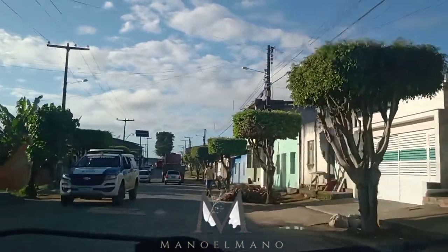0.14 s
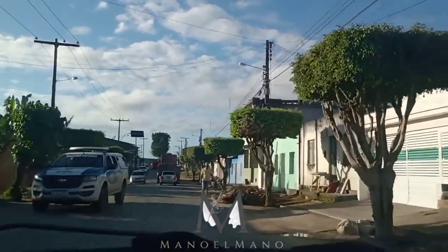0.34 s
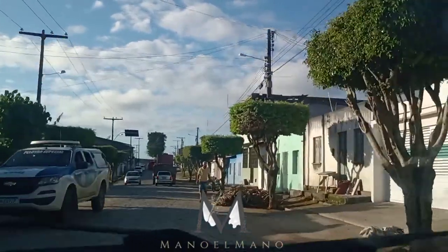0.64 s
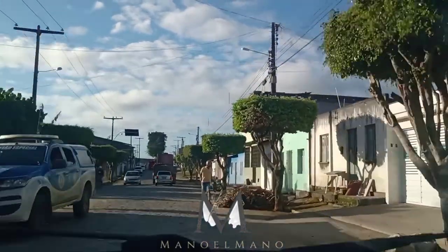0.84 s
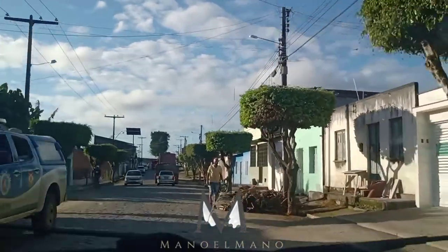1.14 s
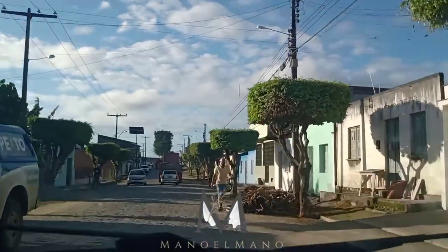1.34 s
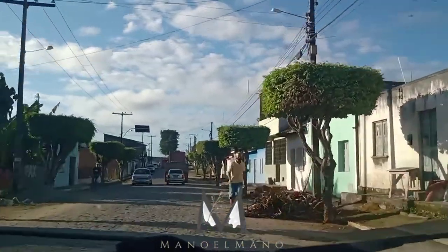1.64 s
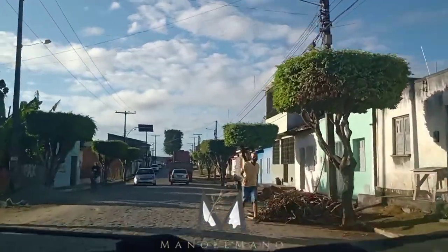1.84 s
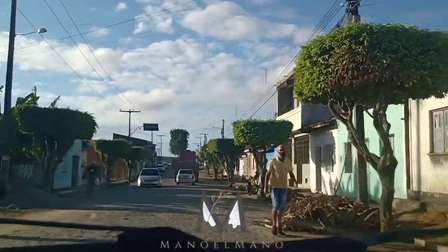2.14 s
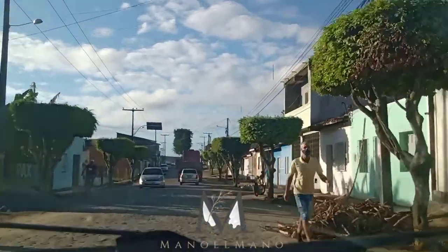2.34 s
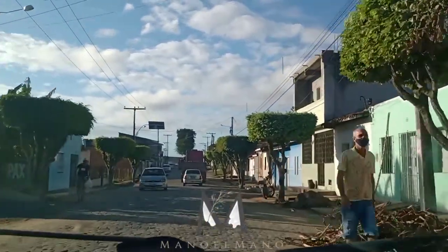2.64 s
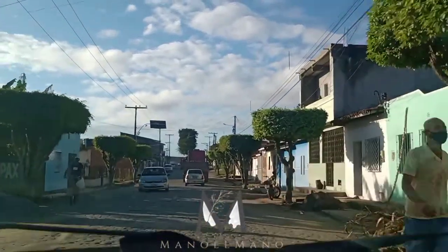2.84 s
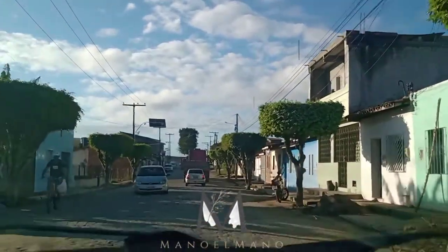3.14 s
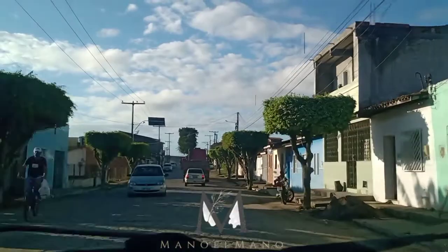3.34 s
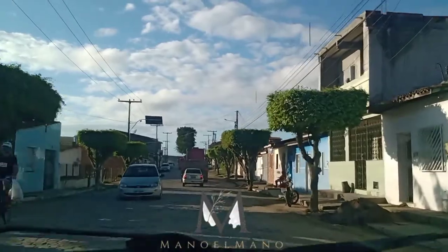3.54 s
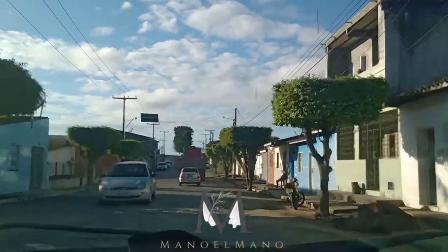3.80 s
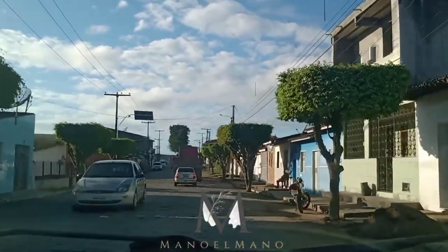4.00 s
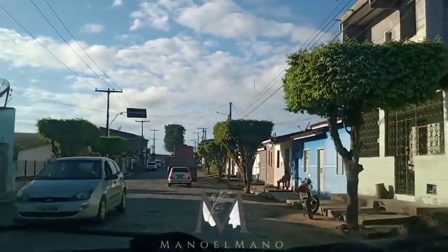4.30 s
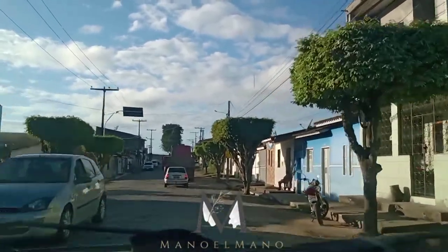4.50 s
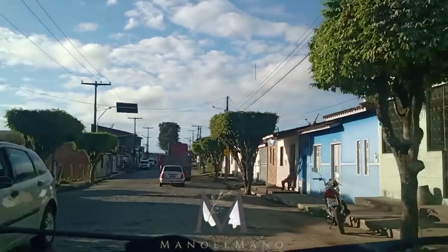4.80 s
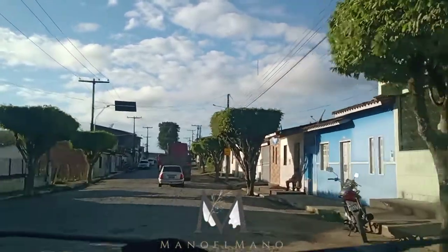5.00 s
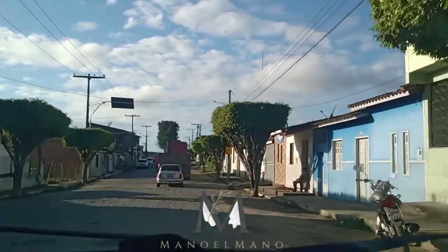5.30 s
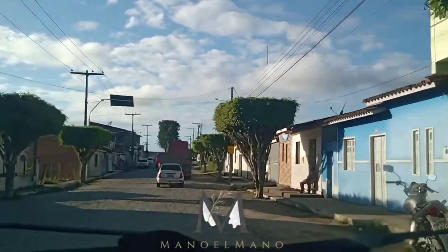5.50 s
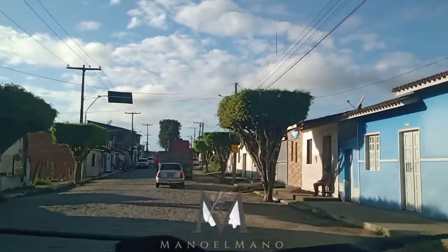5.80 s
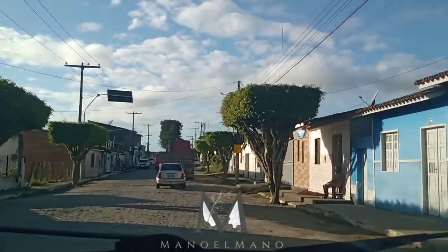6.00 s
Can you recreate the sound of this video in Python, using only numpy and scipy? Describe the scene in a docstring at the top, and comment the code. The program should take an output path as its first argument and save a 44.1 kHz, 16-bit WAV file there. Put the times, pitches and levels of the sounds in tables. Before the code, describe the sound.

Bumpy cobbled-street ride heard from the cabin: booming bodywork, drumming panels, rattling plastic, and one vehicle swishing past outside around two seconds.

```python
"""Inside a car that rolls over cobbles: stones thump the tyres, the body booms and the panels drum.
Loose trim rustles with the jolts, a clip knocks, panels thud and crack, small metal ticks, a mount squeaks
once and the swish of a vehicle passing outside comes and goes. A phone microphone cuts the top.
Random clicks ring resonances for the boom, drumming and rustle; short decaying tones make the knocks;
shaped noise makes the cracks, hum, squeak, swish and hiss."""
import sys
import numpy as np
from scipy import signal
from scipy.io import wavfile
from scipy.ndimage import uniform_filter1d

SR = 44100
rng = np.random.default_rng(int(sys.argv[2]) if len(sys.argv) > 2 else 0)


def digitize_waveform(pressure):
    """Quantize a signal to 16-bit integers and store it at the path in sys.argv[1].

    Rows of a 2-D input are taken as channels; values are limited to [-1, 1].
    """
    field = np.atleast_2d(pressure).T
    bounded = np.clip(field, -1, 1)
    quanta = np.round(bounded * 32767).astype(np.int16)
    wavfile.write(sys.argv[1], SR, quanta)


def volts_from_db(level):
    """Convert decibel levels to linear amplitude ratios."""
    exponent = np.asarray(level, float) / 20
    return 10 ** exponent


N = 271215   # length in samples


def rms_one(x):
    """Scales a sound to an rms of 1."""
    return x / np.sqrt(np.mean(x ** 2) + 1e-20)


def in_time(rows):
    """Joins each column by straight lines over the times in the first, one value a sample."""
    s, *columns = np.transpose(rows)
    return [np.interp(np.arange(N) / SR, s, column) for column in columns]


def drift(rate_hz):
    """Smooth random wandering with an rms of 1; a higher rate wanders faster."""
    # made at one value per 40 samples; the first 2000 values let the filter settle
    r = np.exp(-80 * np.pi * rate_hz / SR)
    noise = rng.standard_normal(N // 40 + 2002)
    slow = signal.lfilter([1], [1, -2 * r, r * r], noise)[2000:]
    return np.interp(np.arange(N) / 40, np.arange(len(slow)), rms_one(slow))


def band_pass(x, edges_hz):
    """Keeps what lies between two frequencies."""
    return signal.sosfilt(signal.butter(2, edges_hz, "band", fs=SR, output="sos"), x)


def resonate(x, hz, width_hz):
    """A resonance of gain 1 at its top."""
    r = np.exp(-np.pi * width_hz / SR)
    feedback = [1, -2 * r * np.cos(2 * np.pi * hz / SR), r * r]
    return signal.lfilter([(1 - r * r) / 2, 0, (r * r - 1) / 2], feedback, x + 1e-18)


def through(peaks, x):
    """Sends a sound through resonances in parallel, signs alternating."""
    return sum((-1) ** k * volts_from_db(db) * resonate(x, hz, width) for k, (hz, width, db) in enumerate(peaks))


def grains(per_s, spread_db):
    """Random clicks of uneven size and either sign."""
    sizes = volts_from_db(spread_db * np.minimum(rng.exponential(1, N), 5)) * rng.choice([-1, 1], N)
    return sizes * (rng.random(N) < per_s / SR)


def evened(x, over_s):
    """Slow swells are halved in dB, so that the road sets the level."""
    swell = np.sqrt(uniform_filter1d(x ** 2, round(over_s * SR)) + 1e-12)
    return rms_one(x / np.sqrt(swell))


def wavering(hz, width_hz):
    """Noise in a narrow band that follows a pitch."""
    turn = 2 * np.pi * np.cumsum(hz) / SR
    return drift(width_hz) * np.sin(turn) + drift(width_hz) * np.cos(turn)


def thump(rows, rise_cycles):
    """A soft blow swells over a part of a cycle or more, then dies away."""
    out = np.zeros(N + SR)
    for (s, db, hz), turn in zip(rows, rng.uniform(-.5, .5, len(rows))):
        cycles = np.arange(SR // 5) / SR * hz
        swell = cycles / rise_cycles * np.exp(1 - cycles / rise_cycles)
        i = round((s - rise_cycles / hz) * SR)   # starts early, so that the swell tops out at s
        out[i:i + len(cycles)] += volts_from_db(db) * swell * np.sin(2 * np.pi * cycles + turn)
    return out[:N]


def strike(hits, modes, vary_db, contact_s, detune):
    """A blow and two weaker bounces ring every mode, each hit with its own mode strengths and detuning."""
    out, t = np.zeros(N + SR), np.arange(SR // 5) / SR
    hz, level_db, t60 = np.transpose(modes)[:, :, None]
    chance = rng.standard_normal((len(hits), 2, len(modes), 1))
    bounces = np.cumsum(rng.uniform(.3, 1, (len(hits), 2)), axis=1) * contact_s
    for (s, db), (strength, pitch), later in zip(hits, chance, bounces):
        decay = volts_from_db(db + level_db + vary_db * strength - 60 * t / np.maximum(t60, .005))
        ring = np.sum(decay * np.sin(2 * np.pi * hz * (1 + detune * pitch) * t), axis=0)
        ring *= 1 - np.exp(-t / .0004)   # the blow builds up over 0.4 ms
        for lag, size in zip([0, *later], [1, .3, .2]):
            i = round((s + lag) * SR)
            out[i:i + len(t)] += size * ring
    return out[:N]


def faint(level_db):
    """Weak blows at random moments, 1.5 a second."""
    chance = rng.random((round(1.5 * N / SR), 2))
    return [(s * (N - 1) / SR, level_db + 6 * (size - .5)) for s, size in chance]


def ride():
    """The road and its stretches set the boom; panels and trim follow the road with shares of their own."""
    # how rough the road is, as a level for the boom: t/s, level/dB
    roughness = [(0.0, -19), (0.24, -26), (0.45, -27.5), (1.03, -29), (2.24, -25.5), (2.43, -24.5),
                 (3.54, -25), (3.63, -24.5), (3.8, -26.5), (4.16, -25), (5.17, -24), (5.72, -28),
                 (5.81, -25), (6.15, -29)]
    # uneven stretches swell the rumble, smooth ones lull it:
    # middle t/s, half length/s, change in body/dB, in panels/dB, in trim/dB
    stretches = [(0.174, 0.067, 7, 8, 3.5), (0.384, 0.062, 2, 7, -1), (0.674, 0.26, 3, 4, 4),
                 (0.796, 0.041, 4.5, 4.5, -0.5), (1.28, 0.14, 3, -2.5, 0), (1.538, 0.072, 6, 0, -2),
                 (1.569, 0.057, -3, 5.5, 5), (1.685, 0.032, -9, -7.5, -6), (1.984, 0.37, 0.5, 1, 6.5),
                 (2.124, 0.058, -11, 1, 7.5), (2.295, 0.07, 3.5, 2.5, 2), (2.386, 0.054, 2.5, -0.5, 6),
                 (2.752, 0.065, 2, 2, 0), (2.881, 0.023, -11.5, 4.5, 0.5), (3.088, 0.19, 0.5, 1, 3.5),
                 (3.269, 0.051, 5.5, 4, -6.5), (3.532, 0.12, 4, 2.5, 2.5), (3.62, 0.044, -4.5, -5.5, -3.5),
                 (3.724, 0.13, 7, 10.5, 7.5), (4.146, 0.15, 6.5, 6.5, 7.5), (4.749, 0.029, -13.5, -3, 1),
                 (4.854, 0.081, 0, 8, 6), (4.948, 0.0071, -2, 6, 9), (5.014, 0.13, -5, -6, -4),
                 (5.108, 0.038, 1, 7, -1), (5.18, 0.042, -1, 1.5, 2), (5.577, 0.24, 4.5, 6.5, 7),
                 (5.895, 0.046, -2, -3, -1.5), (5.978, 0.076, 0, 4, -2)]
    road_db, = in_time(roughness)
    t, swing, swells = np.arange(N) / SR, road_db - road_db.mean(), np.zeros((3, N))
    for s, half, *rise_db in stretches:
        place = np.clip((t - s) / max(half, .01), -1, 1)   # a half length is at least 10 ms
        swells += np.outer(rise_db, np.cos(np.pi / 2 * place) ** 2)
    boom_db = road_db + .5 + swells[0]
    drumming_db = -35 + .97 * swing + swells[1] + 2 * drift(13.0)
    rustle_db = -54 + swing + swells[2]
    return boom_db, drumming_db, rustle_db


def cobbles(boom_db, drumming_db):
    """Random stones under the front axle boom in the body; those under both axles drum on the panels."""
    # what the body booms with: f/Hz, width/Hz, level/dB
    body = [(30, 11, -15.5), (47.2, 20.6, -6.5), (68.7, 22.15, 0.5), (98.6, 23.7, -2.5), (128.8, 28.96, -4),
            (158.9, 20.9, -6.5)]
    # what the panels drum with: f/Hz, width/Hz, level/dB
    panel_peaks = [(189.6, 39, 4), (241, 75.5, 4), (283.4, 71, 1), (410.7, 53.6, -3), (511, 136, -12),
                   (647, 159, -14.5), (853, 240, -23.5)]
    front, rear = [grains(600, spread_db=1.0) for axle in ("front", "rear")]
    boom = evened(through(body, front), over_s=.12)
    panels = band_pass(through(panel_peaks, .5 * front + rear), [170, 1100])
    return volts_from_db(boom_db) * boom + volts_from_db(drumming_db) * evened(panels, over_s=.04)


def trim(rustle_db):
    """Dense tiny contacts rustle in eleven-edged noise bands; a jolt throws in a burst that dies away."""
    # jolts that shake the trim: start t/s, level/dB, extra treble/dB
    jolts = [(0.083, -41.5, -9), (0.107, -22, 1.5), (0.139, -27.5, 0), (0.187, -24, -5.5), (0.312, -50, 12),
             (0.352, -41, 13.5), (0.383, -26, -1), (0.604, -25.5, -8), (0.66, -28.5, -2.5),
             (0.763, -28, -2), (1.074, -41, 0), (1.286, -25.5, -16), (2.345, -33, 12), (2.422, -35, 10.5),
             (2.7176, -25.5, 1), (2.9113, -29, 2.5), (2.976, -38, 13), (3.0466, -40, -12), (3.07, -21, -9),
             (3.242, -41, 11), (3.4037, -26.5, 2), (3.564, -28.5, 3), (3.698, -18, 8), (3.726, -21, 2),
             (3.774, -24, -3), (3.815, -33, 5), (3.85, -40, 4), (3.939, -32, -13), (4.102, -37, 5),
             (4.201, -15, -2.5), (4.223, -32, -8), (4.281, -25.5, -6), (4.318, -48, 4), (4.338, -40, -3),
             (4.378, -40, 6), (4.418, -35, 1.5), (4.4523, -44, 2), (4.47, -38, 4), (4.52, -22, -2),
             (4.565, -27, 2), (4.592, -26, 1), (4.63, -33, -7), (4.719, -43, -9), (4.831, -28.5, 4),
             (4.9315, -21.5, -18), (5.089, -31, -11), (5.158, -27, -2), (5.239, -24, -8), (5.3217, -33, 2),
             (5.379, -19, -14), (5.52, -24.5, -0.5), (5.5423, -33, 3), (5.564, -23, 4.5), (5.882, -26.5, 5),
             (5.98, -24, -11), (5.995, -18, -7), (6.126, -31, -2)]
    # tone of the rustle: f/Hz, relative level per hertz of bandwidth/dB
    tone = np.array([(410, -31), (700, -1), (1070, -3), (1290, -1), (1580, -7), (2830, -12), (4660, -19.5),
                     (5300, -22), (7300, -18), (8000, -26), (10400, -60), (17600, -120)])
    burst = np.zeros((2, N))   # one row for the low part, one for the treble
    for s, db, treble_db in jolts:
        i = round(s * SR)
        t = np.arange(min(N - i, SR // 4)) / SR
        # contacts peak far over their rms, hence 19 dB less; rise 6 ms, fall by 60 dB in 89 ms
        shape = volts_from_db(db - 19 - 60 * t / .089) * np.minimum(t / .006, 1)
        burst[:, i:i + len(t)] += volts_from_db([[0], [treble_db]]) * shape

    # small random jolts, 40 a second, each fading by 60 dB in 60 ms, over the steady rustle
    shakes = signal.lfilter([1], [1, -volts_from_db(-60 / (.06 * SR))], np.abs(grains(40, spread_db=1.0)))
    shake = volts_from_db(rustle_db + 1.0 * drift(33.0)) * (1 + volts_from_db(-8) * shakes)

    edges, (low, high, ring) = np.geomspace(750, 8400, 11), np.zeros((3, N))
    contacts = [grains(5000, spread_db=0.5) for stream in range(2)]   # neighbouring bands differ
    for k, (a, b) in enumerate(zip(edges, edges[1:])):
        hz = np.sqrt(a * b)
        band_db = np.interp(np.log(hz), np.log(tone[:, 0]), tone[:, 1])
        band = band_pass(contacts[k % 2], [a, b]) * volts_from_db(band_db + 2.34 * drift(12.7))
        if hz < 2000:
            low += band
        else:
            high += band
        if a < 5137 < b:   # jolts wake a ring here that the steady rustle lacks
            ring += (volts_from_db(6.5) - 1) * band
    scale = np.sqrt(np.mean(low ** 2))
    brightness = volts_from_db(1.04 + 1.5 * drift(3.5))   # treble of the steady rustle against its low part
    steady = shake * (low + brightness * high) / scale
    jolted = burst[0] * volts_from_db(-2.5) * low + burst[1] * (high + ring)
    return steady + jolted / np.sqrt(scale ** 2 / 2 + np.mean(high ** 2))


def hum():
    """A rough hum near one pitch, perhaps the tyre tread: noise a few tens of hertz wide."""
    # loudness of the hum: t/s, level/dB
    loudness = [(0, -54), (1.2, -54.5), (1.5, -49.5), (2.2, -44), (3.1, -51.5), (3.4, -56.5), (5.5, -46.5),
                (5.8, -50), (6.15, -69)]
    level_db, = in_time(loudness)
    return volts_from_db(level_db + 1.5 * drift(3)) * wavering(np.full(N, 606), 45)


def hiss():
    """A faint, steady hiss of white noise."""
    return volts_from_db(-72.5) * rng.standard_normal(N)


def bumps():
    """High stones under a tyre thump the body with quick low swells."""
    # high stones: t/s at the peak, level/dB, f/Hz
    stones = [(0.011, -13, 90), (0.09, -10, 95), (0.155, -13, 85), (0.198, -15, 110), (0.312, -17, 100),
              (0.387, -15, 85), (0.792, -16, 150), (2.03, -17, 100), (2.18, -16, 110), (3.001, -17, 95),
              (3.09, -12, 100), (3.284, -13, 100), (3.484, -15, 80), (3.71, -14, 90), (4.14, -10, 110),
              (4.354, -15, 100), (4.793, -20, 240), (4.821, -16, 75), (4.852, -19, 230), (4.866, -18, 190),
              (5.097, -17, 145), (5.109, -16, 145), (5.251, -15, 90), (5.555, -14, 90)]
    return thump(stones, rise_cycles=.45)


def clip_knocks():
    """A loose clip knocks: each blow rings its short modes."""
    # blows: t/s, level/dB
    blows = [(0.087, -27), (0.11, -22), (0.133, -33), (0.188, -27), (0.208, -31), (0.4, -35), (1.285, -36),
             (1.4, -39), (2.0388, -34), (2.0946, -33), (2.1178, -28), (2.244, -35), (2.3413, -45),
             (2.377, -31), (2.438, -28.5), (2.6651, -31.5), (2.73, -34), (3.3605, -34), (3.57, -40),
             (3.6955, -18), (3.8517, -26), (4.0206, -33.5), (4.1026, -29), (4.3173, -34), (5.5925, -33),
             (5.885, -39), (6.137, -33)]
    clip = [(1240, -10, 0.05), (1350, -9, 0.045), (1450, -14, .035), (2680, -21, 0.02), (3860, -26, .02)]
    return strike([*blows, *faint(-44)], clip, vary_db=2, contact_s=.004, detune=.025)


def cracks():
    """Dry cracks in the trim: a few milliseconds of wide noise with a sudden start."""
    # cracks: t/s, level/dB, centre f/Hz
    snaps = [(0.0875, -40, 2800), (0.108, -38, 4500), (0.1152, -35, 5500), (0.14, -39, 4500),
             (0.6015, -44, 3200), (0.6604, -45, 3200), (1.074, -42, 3700), (1.2894, -46, 2800),
             (3.0465, -42, 3000), (3.5683, -43, 2500), (3.6935, -38, 3500), (3.696, -29, 3800),
             (3.73, -35, 2500), (3.9374, -47, 2500), (4.933, -33, 2300), (4.944, -37, 2300),
             (5.1412, -42, 1800), (5.3802, -44, 2500), (5.446, -43, 2800), (5.9788, -43, 4000)]
    out, t = np.zeros(N + SR), np.arange(SR // 20) / SR
    for (s, db, hz), noise in zip(snaps, rng.standard_normal((len(snaps), len(t)))):
        edges = hz * 2 ** (1.3 * np.array([-.5, .5]))   # 1.3 octaves wide
        # rises in 1 ms and falls by 60 dB in 35 ms
        shape = volts_from_db(db - 4 - 60 * t / .035) * np.minimum(t / .001, 1)
        i = round(s * SR)
        out[i:i + len(t)] += shape * rms_one(band_pass(noise, edges))
    return out[:N]


def clinks():
    """A small hard part clinks: blows ring a few high modes."""
    # blows: t/s, level/dB
    blows = [(0.113, -34), (0.19, -36), (2.718, -42), (5.672, -42), (5.765, -42), (5.885, -35),
             (5.979, -39), (6.012, -45)]
    # modes of the part: f/Hz, level/dB, time to fall by 60 dB/s
    hard_part = [(2880, -3, .045), (3200, -11, .02), (6900, -15, .03)]
    return strike(blows, hard_part, vary_db=1.5, contact_s=.003, detune=.015)


def ticks():
    """Something small and metallic ticks: blows ring very short, high modes."""
    # blows: t/s, level/dB
    blows = [(0.1156, -32), (2.6035, -45), (2.6339, -44), (2.9, -51), (2.9272, -41), (2.9821, -39),
             (3.0465, -36), (3.0974, -39), (3.3767, -38), (3.5354, -43), (3.6975, -26), (4.2033, -31.5),
             (4.2258, -33), (4.262, -47), (4.272, -44), (4.6882, -42), (4.8379, -46), (5.1597, -35),
             (5.3218, -44), (5.5578, -37), (5.566, -32), (5.6116, -40)]
    # modes of the metal: f/Hz, level/dB, time to fall by 60 dB/s
    metal = [(5130, -4, 0.015), (5380, -8, 0.016), (6150, -13, 0.015), (7530, -16, 0.015)]
    return strike([*blows, *faint(-55)], metal, vary_db=1.5, contact_s=.003, detune=.015)


def passing():
    """Tyre and engine hiss from outside, read faster on approach and slower after (Doppler)."""
    # the vehicle passing: t/s, level/dB, pitch ratio
    approach = [(1.0, -77, 1.05), (1.4, -58, 1.05), (1.65, -49, 1.03), (1.8, -43, 1.01), (1.9, -41, .99),
                (2.0, -42.5, .975), (2.07, -47, .965), (2.15, -50, .96), (2.6, -64, .955), (3.0, -80, .95)]
    # tone of the swish: f/Hz, width/Hz, level/dB
    swish = [(1210, 81, 3), (1890, 1500, -3.5), (2580, 500, 4.5), (3970, 990, -4.5), (5040, 900, -6),
             (6430, 1200, -8.5), (7700, 900, -9.5)]
    level_db, ratio = in_time(approach)
    source = through(swish, rng.standard_normal(2 * N))
    heard = np.interp(np.cumsum(ratio), np.arange(2 * N), source)
    return volts_from_db(level_db + 1.0 * drift(2.7)) * rms_one(heard)


def thuds():
    """Now and then a panel thuds: a soft swell over more than one cycle."""
    # thuds: t/s at the peak, level/dB, f/Hz
    blows = [(1.562, -29, 400), (2.18, -29, 410), (2.878, -23, 420), (3.707, -22, 400), (3.742, -27, 400),
             (4.09, -23, 400), (4.125, -28, 450), (4.184, -24, 400), (4.226, -29, 400), (5.169, -27, 400),
             (5.478, -28, 410), (5.976, -28, 400)]
    return thump(blows, rise_cycles=1.5)


def squeak():
    """Rubber slips unevenly on plastic: a breathy whistle with weaker neighbours above and below."""
    # path of the whistle: t/s, f/Hz, level/dB
    path = [(2.68, 5330, -70), (2.72, 5380, -59), (2.745, 5480, -54), (2.79, 5470, -54), (2.83, 5400, -59),
            (2.87, 5350, -76)]
    # the whistle and its neighbours: pitch ratio, width/Hz, level/dB
    parts = [(1, 150, 0), (.96, 300, -3), (.905, 200, -5), (1.205, 120, -9), (1.38, 150, -11),
             (.685, 100, -10), (.53, 50, -5)]
    hz, level_db = in_time(path)
    return volts_from_db(level_db) * sum(volts_from_db(db) * wavering(ratio * hz, width) for ratio, width, db in parts)


def lid_knocks():
    """A lid knocks: blows ring its many modes."""
    # blows: t/s, level/dB
    blows = [(4.931, -31), (5.238, -35)]
    # modes of the lid: f/Hz, level/dB, time to fall by 60 dB/s
    lid = [(865, -3, .05), (1330, -12, .03), (1510, -6, .045), (1950, -11, .03), (2200, -9, .03),
           (2700, -12, .035), (3150, -11, .03)]
    return strike(blows, lid, vary_db=1.5, contact_s=.0001, detune=.01)


def pings():
    """Short pings: blows ring a few modes that keep nearly the same pitch."""
    # blows: t/s, level/dB
    blows = [(4.954, -41), (4.961, -34)]
    # modes of the ping: f/Hz, level/dB, time to fall by 60 dB/s
    ping = [(1950, 0, .035), (2150, -9, .03), (3100, -14, .03), (3760, -6, .04)]
    return strike(blows, ping, vary_db=0, contact_s=.0001, detune=.003)


def cabin(x):
    """A few quick, soft reflections off glass and seats."""
    out = x.copy()
    for lag_s, db in [(.0023, -9.5), (.0041, -13), (.0067, -11), (.0103, -15)]:
        lag = round(lag_s * SR)
        out[lag:] += volts_from_db(db) * x[:-lag]
    return out


def scene():
    """Adds up all sources; the knocks and cracks also reflect in the cabin."""
    boom_db, drumming_db, rustle_db = ride()
    road = cobbles(boom_db, drumming_db) + bumps() + thuds() + hum()
    knocks = clip_knocks() + clinks() + ticks() + lid_knocks() + pings()
    total = road + trim(rustle_db) + cabin(knocks + cracks()) + passing() + squeak() + hiss()
    return total[None]


def band_limit(x):
    """A steep low-pass at the top of the band."""
    return signal.sosfilt(signal.butter(12, 8500, fs=SR, output="sos"), x)


def record(dry):
    """The phone microphone drops the deepest bass; the top rolls off steeply."""
    x = signal.sosfilt(signal.butter(3, 42, "high", fs=SR, output="sos"), dry)
    x = signal.sosfilt(signal.butter(8, 7880, fs=SR, output="sos"), x)
    x = signal.sosfilt(signal.cheby2(10, 60, 9380, fs=SR, output="sos"), x)   # 60 dB down from 9380 Hz
    return band_limit(x)


dry = scene()
out = record(dry)
digitize_waveform(out)
```